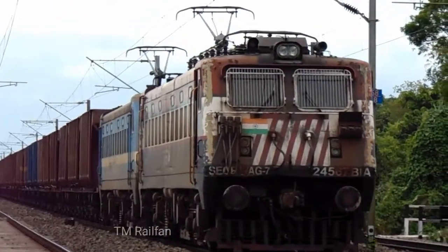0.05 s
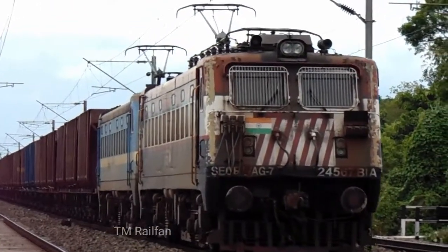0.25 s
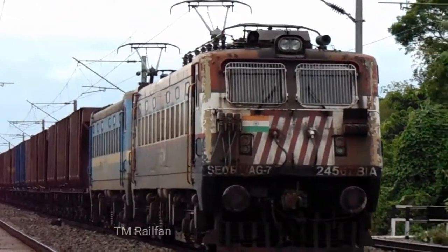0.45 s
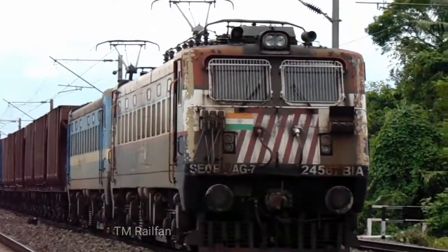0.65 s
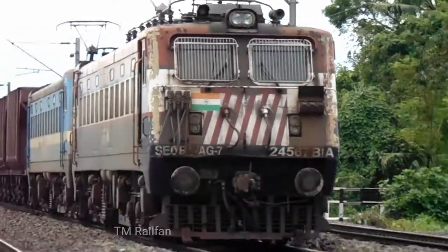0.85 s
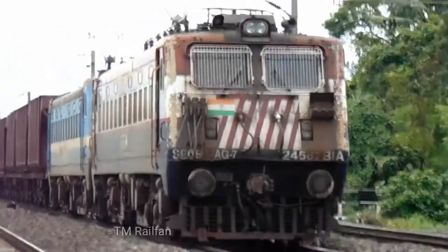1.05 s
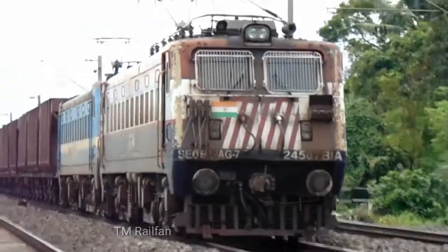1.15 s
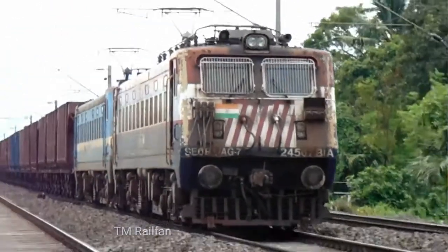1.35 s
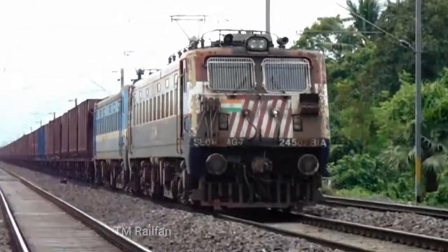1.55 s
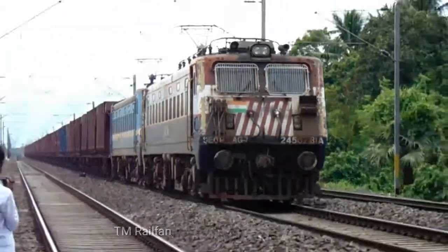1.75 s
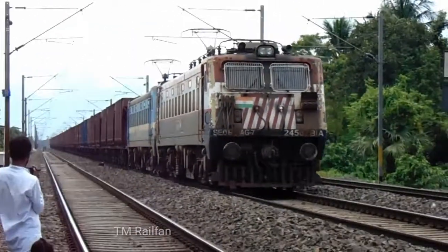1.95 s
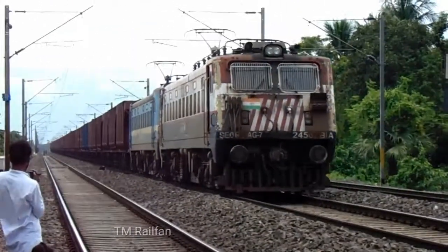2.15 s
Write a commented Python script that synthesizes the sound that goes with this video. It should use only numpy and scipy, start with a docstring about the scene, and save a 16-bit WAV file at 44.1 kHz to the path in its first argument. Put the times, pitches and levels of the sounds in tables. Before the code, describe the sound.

A train horn gives four short blasts and a long one over a faint rumble.

```python
"""Freight train sounding its horn

An approaching electric locomotive gives four short blasts and a long one on its air horn.
Each cycle of the note is a sharp pressure spike plus its bounce off the ground, which lags more
as the train nears. When the air is cut, the note goes sharp and dull and rings out. A low rumble and
distant echoes lie behind. Automatic gain control turns it all down just after the first blast hits."""
import sys
import numpy as np
from scipy import signal
from scipy.fft import rfft, irfft, next_fast_len
from scipy.io import wavfile
from scipy.ndimage import uniform_filter1d, map_coordinates

SR = 44100
rng = np.random.default_rng(int(sys.argv[2]) if len(sys.argv) > 2 else 0)


def wrap_up_sound(samples):
    """Save the sound to the file named by the first command line argument, as 16-bit audio."""
    columns = np.atleast_2d(samples).T
    # keep every value between -1 and 1, then stretch to whole-number steps
    tamed = np.clip(columns, -1, 1)
    steps = np.round(tamed * 32767).astype(np.int16)
    wavfile.write(sys.argv[1], SR, steps)


N = 97020
TIME = np.arange(N) / SR
PITCH_HZ, TOP_HZ = 302.92, 14400  # the horn's note at full pressure; the upper limit of the treble


def amp(db):
    """Turn decibels into a gain."""
    return np.exp(np.asarray(db) * (np.log(10) / 20))


def along(points, hz):
    """Read between (Hz, value) points on a log frequency axis."""
    freqs, values = np.transpose(points)
    return np.interp(np.log(hz + 1), np.log(freqs + 1), values)


def curve(rows):
    """Join (seconds, value) points with straight lines."""
    return np.interp(TIME, *np.transpose(rows))


def ramp(progress):
    """A smooth step from 0 to 1."""
    return np.sin(np.pi / 2 * np.clip(progress, 0, 1)) ** 2


def wobble(rate):
    """A smooth curve through `rate` random values a second."""
    at = np.linspace(0, N, 600)
    values = map_coordinates(rng.standard_normal(256), [at * rate / SR], mode="wrap")
    return np.interp(np.arange(N), at, values)


def filtered(x, response):
    """Scale each frequency in x by response(hz)."""
    size = next_fast_len(N + SR // 2)
    return irfft(rfft(x, size) * response(np.fft.rfftfreq(size, 1 / SR)), size)[:N]


def noise(spectrum):
    """Noise shaped by a spectrum, then scaled to an average power of 1."""
    x = filtered(rng.standard_normal(N), lambda hz: amp(along(spectrum, hz)))
    return x / x.std()


# The rumble's tone. Each row: frequency in Hz, relative level in dB.
RUMBLE_SPECTRUM = [(20, -13), (35, -5), (49, -2), (70, -6.5), (100, -17), (170, -21.5), (230, -7.5),
                   (450, -26), (750, -23), (1200, -28), (3000, -34.5), (8000, -44), (15000, -65)]
# How loud the rumble is. Each row: time in seconds, level in dB.
RUMBLE_LOUDNESS = [(0, -47.5), (.2, -42.5), (.4, -43), (.7, -43.5), (1.02, -45.5), (1.35, -41.5),
                   (2.2, -41)]


def rumble(drone_hz=52.2):
    """Wheels and wagons roll closer, with the locomotive's low drone."""
    drone = amp(3.6 * wobble(5.4)) * np.sin(2 * np.pi * drone_hz * TIME + 0.37 * wobble(5.5))
    return amp(curve(RUMBLE_LOUDNESS)) * (noise(RUMBLE_SPECTRUM) + drone)


# The echo's tone. Each row: frequency in Hz, relative level in dB.
ECHO_SPECTRUM = [(303, 11), (606, -2.5), (909, 6.5), (1212, 0), (1515, -1.5), (2120, -6.5), (3000, -12),
                 (6000, -20.5), (14000, -37.5)]
# How the echo swells. Each row: time in seconds, level in dB.
ECHO_LOUDNESS = [(0, -52), (.15, -53), (.45, -48), (.75, -37.5), (1.28, -42), (2.03, -37), (2.18, -36.5)]


def far_echo(fade_rate=20):
    """Echoes from far along the line blur into one held note, each harmonic fading and drifting alone."""
    tone = 0
    for k in range(1, int(TOP_HZ / PITCH_HZ)):
        harmonic = np.exp(2j * np.pi * k * PITCH_HZ * TIME)
        scatter = k ** 0.25
        paths = np.exp(2j * np.pi * rng.random()) + scatter * (wobble(fade_rate) + 1j * wobble(fade_rate))
        gain = amp(along(ECHO_SPECTRUM, k * PITCH_HZ)) / np.sqrt(1 + 2 * scatter ** 2)
        tone += gain * (paths * harmonic).real
    return amp(curve(ECHO_LOUDNESS)) * tone


# The valve's hiss. Each row: frequency in Hz, relative level in dB.
LEAK_SPECTRUM = [(300, -7), (1500, -3), (2200, -21), (3100, 3), (4500, -19), (9000, -19.5), (14000, -20)]


def valve_leak(start_s=0.16, stop_s=0.303, fade_s=0.034, level_db=-35.5):
    """Air hisses through the valve, starting just before the first blast."""
    envelope = ramp((TIME - start_s) / fade_s) * (1 - ramp((TIME - stop_s) / fade_s))
    return amp(level_db) * envelope * noise(LEAK_SPECTRUM)


# The five blasts. Each row: start in seconds, air cut in seconds, relative level in dB,
# rise time in seconds, pressure release time in seconds, ring-out in dB per second.
HORN_BLASTS = [(0.193, 0.295, -2, 0.031, 0.073, 82), (0.481, 0.641, -2.2, 0.049, 0.065, 57),
               (0.748, 0.918, -4.5, 0.0433, .042, 29), (1.007, 1.171, -2.9, 0.054, .048, 55),
               (1.278, 1.903, -3.7, 0.06, 0.062, 77)]


def blasts(slack_hz=8.8, settle_s=0.028):
    """Air sets the horn's diaphragm swinging; at low pressure its pitch is up to slack_hz higher."""
    pressure, swing, settled = np.zeros((3, N))
    for start, stop, db, rise, release, ring_out in HORN_BLASTS:
        opening = ramp((TIME - start) / rise)
        since_cut = np.maximum(TIME - stop, 0)
        air_left = np.exp(-(since_cut / release) ** 1.96)  # holds briefly, then collapses
        pressure = np.maximum(pressure, opening ** 3.6 * air_left)  # the spike sharpens late in the rise
        swing = np.maximum(swing, opening * amp(db - ring_out * since_cut))
        settling = 1 - np.exp(-np.maximum(TIME - start - rise / 2, 0) / settle_s)
        settled = np.maximum(settled, settling * air_left ** 1.4)  # pitch moves faster than pressure
    return pressure, swing, PITCH_HZ + slack_hz * (1 - settled)


def spike_harmonics(spectrum, count):
    """The strength and phase of harmonics that add up to a sudden spike with this spectrum."""
    hz = PITCH_HZ * np.maximum(np.arange(count + 1), 1)
    cepstrum = irfft(np.log(amp(along(spectrum, hz))))
    cepstrum[1:count] *= 2  # folding onto the first half puts the tail after the spike
    cepstrum[count + 1:] = 0
    return -np.exp(rfft(cepstrum))[1:]


# The horn's tone at full pressure. Each row: frequency in Hz, relative level in dB.
HORN_SPECTRUM = [(303, -19), (606, -29), (909, -29), (1212, -25.5), (1515, -31.5), (2121, -29),
                 (2727, -30.5), (3030, -31.5), (3333, -33.5), (3636, -32), (3939, -41), (4242, -32),
                 (4545, -36.5), (4848, -35.5), (5454, -36), (5757, -38.5), (6363, -39), (6666, -38),
                 (6969, -41.5), (7575, -39.5), (8181, -39), (8484, -48.5), (8787, -40), (9090, -45),
                 (9696, -40.5), (11211, -44), (12120, -44), (13029, -44), (13938, -47.0)]
# How late the ground bounce arrives. Each row: time in seconds, lag in milliseconds.
BOUNCE_LAG = [(0.24, 0.43), (0.6, 0.46), (0.86, 0.48), (1.08, 0.502), (1.14, 0.506), (1.36, 0.53),
              (1.5, 0.58), (1.66, 0.61), (1.82, 0.61), (1.89, 0.64)]
# Brief skips in the note. Each row: time in seconds, share of a cycle skipped.
TONE_SKIPS = [(0.664, 0.085), (0.928, .42), (1.174, .5), (1.654, 0.014)]
# Slow changes in the treble. Each row: time in seconds, gain in dB at the tenth harmonic.
TREBLE_DRIFT = [(.23, -1.5), (.6, -2.5), (.87, -.5), (1.12, -0.23), (1.4, 0.5), (1.62, -0.5), (1.88, -1.5)]
# Air rushing through the horn. Each row: frequency in Hz, relative level in dB.
AIR_SPECTRUM = [(200, -24), (700, -10), (3000, -4.5), (7000, -2), (14000, -17)]


def horn(tone_db=9.5, air_db=-36, dull_db=10, waver_hz=0.25, skip_s=0.0062):
    """A stream of spikes, sharper with more pressure, plus their upside-down bounce off the ground."""
    pressure, swing, hz = blasts()
    cycle = np.exp(2j * np.pi * np.cumsum(hz + waver_hz * wobble(69.74)) / SR)
    bounce_step = amp(0.06) * np.exp(-2j * np.pi * hz * curve(BOUNCE_LAG) / 1000)
    skip_edges = np.ravel([(at - skip_s / 2, at + skip_s / 2) for at, _ in TONE_SKIPS])
    skipped_cycles = np.cumsum([0] + [share for _, share in TONE_SKIPS])
    skip_phase = np.repeat(2 * np.pi * skipped_cycles, 2)[1:-1]
    treble = curve(TREBLE_DRIFT)
    tone = 0
    for k, gain in enumerate(spike_harmonics(HORN_SPECTRUM, count=48), 1):
        lead = 3.37 / k  # radians: the horn's flare sends low harmonics ahead
        shift = np.interp(TIME, skip_edges, np.exp(1j * (lead - k * skip_phase)))
        harmonic = gain * shift * cycle ** k
        bounce = 0.38 * bounce_step ** k
        loss_db = dull_db * max(k - 1.71, 0) ** 0.42 * (1 - pressure)  # overtones need pressure
        flicker_db = np.log10(k) * (treble + 1.75 * wobble(7))
        tone += amp(flicker_db - loss_db) * (harmonic * (1 - bounce)).real
    air = pressure * noise(AIR_SPECTRUM) * (1 + 0.5 * cycle.real)
    return swing * (amp(tone_db) * tone + amp(air_db) * air)


# How long sound lingers by the track. Each row: frequency in Hz, seconds to fade by 60 dB.
TRACKSIDE_DECAY = [(300, 0.12), (2000, 0.34), (6000, 0.33), (14000, .3)]


def trackside(x, level_db=-12.5):
    """Trees and wagons scatter the sound into a short, soft tail."""
    hz, t, bands = signal.stft(rng.standard_normal(SR // 2), SR, nperseg=256)
    decay = amp(-60 * t / along(TRACKSIDE_DECAY, hz)[:, None])
    tail = signal.istft(bands * decay, SR, nperseg=256)[1]
    return amp(level_db) * signal.fftconvolve(x, tail / np.linalg.norm(tail))[:N]


def scene():
    """The horn, its surroundings and the rolling train, in one channel."""
    near = horn() + valve_leak()
    return (near + trackside(near) + far_echo() + rumble())[None]


def gain_control(x, target_db=-21, lag_s=0.046, glide_s=0.0027, recover_db_per_s=0.5):
    """Turn the volume down a moment after a loud sound, then let it creep back up."""
    level_db = 10 * np.log10(np.abs(uniform_filter1d(x * x, size=440)) + 1e-12)
    excess_db = np.maximum(level_db - target_db, 0)
    recovery = recover_db_per_s * TIME
    cut_db = np.maximum.accumulate(excess_db + recovery) - recovery
    late_cut_db = np.interp(TIME - lag_s, TIME, cut_db)
    return x * amp(-uniform_filter1d(late_cut_db, int(glide_s * SR)))


# Overall tone: a softer fundamental and slightly stronger overtones.
# Each row: frequency in Hz, gain in dB.
TONE_BALANCE = [(50, -0.5), (303, -3), (606, 2.5), (909, 2.5), (1212, 0.5), (1800, 2), (2700, 1.5),
                (5000, 1), (9000, 2), (14000, 2)]


def record(dry):
    """Tone balance, gain control, soft overload and a cut of the highest treble."""
    x = filtered(dry[0], lambda hz: amp(along(TONE_BALANCE, hz)))
    x = gain_control(x)
    x = x / (1 + (x / 0.9) ** 4) ** 0.25  # round off peaks to stay under 0.9
    return filtered(x, lambda hz: 1 - ramp((hz - TOP_HZ) / 400 + 0.5))[None]


dry = scene()
out = record(dry)
wrap_up_sound(out)
```